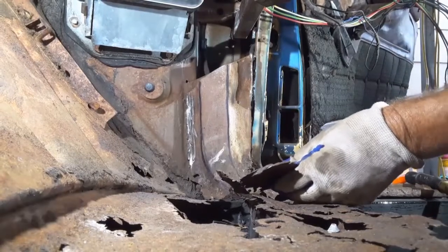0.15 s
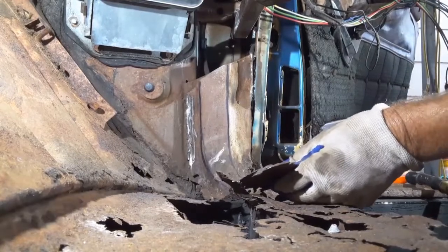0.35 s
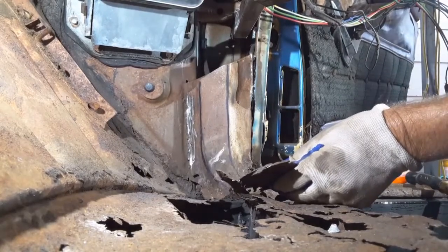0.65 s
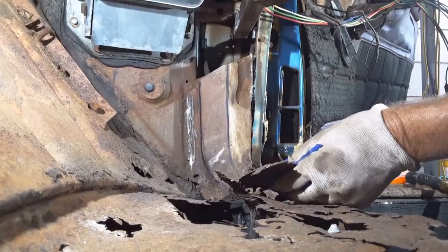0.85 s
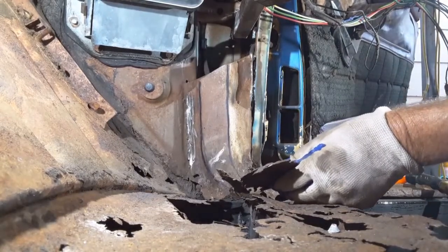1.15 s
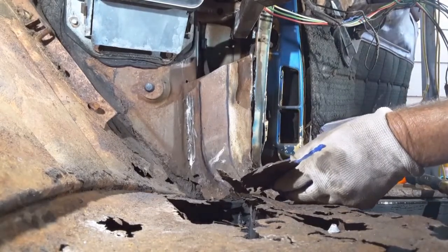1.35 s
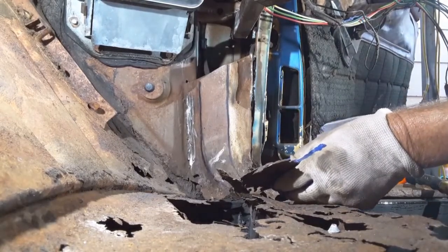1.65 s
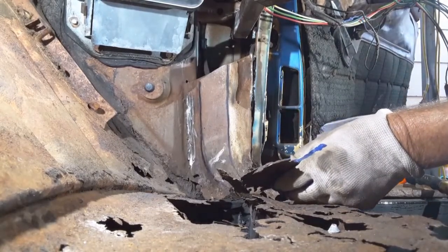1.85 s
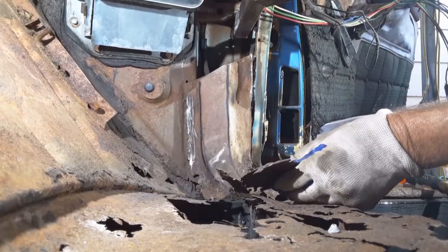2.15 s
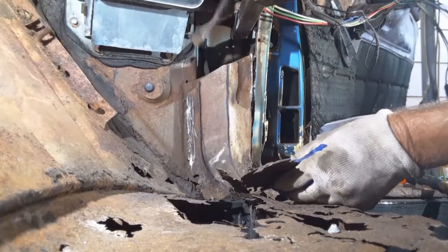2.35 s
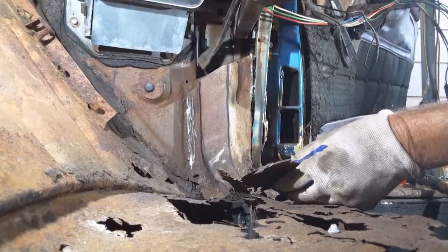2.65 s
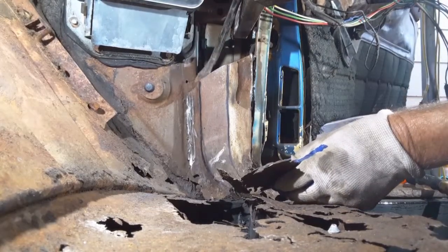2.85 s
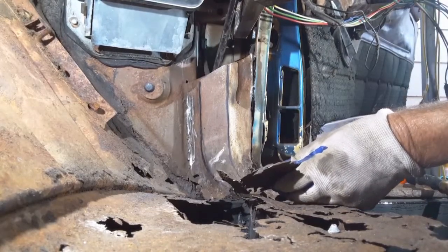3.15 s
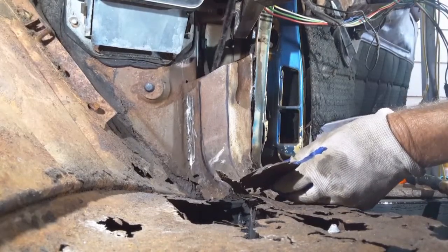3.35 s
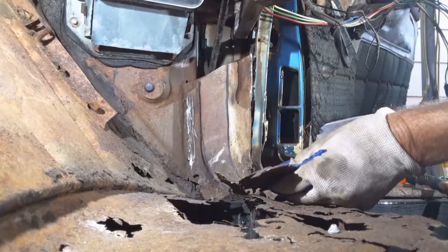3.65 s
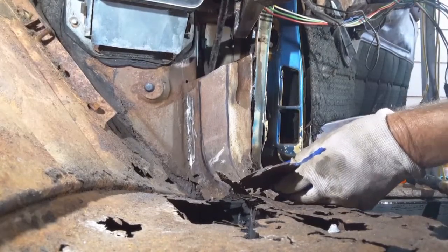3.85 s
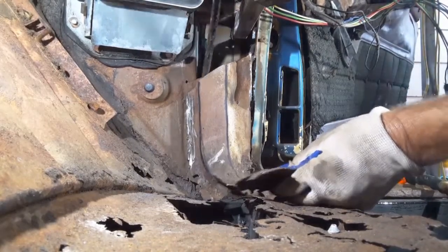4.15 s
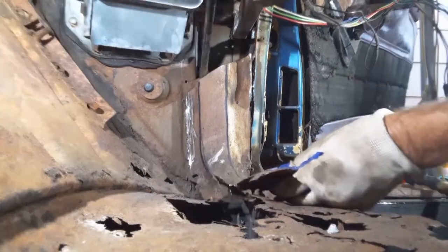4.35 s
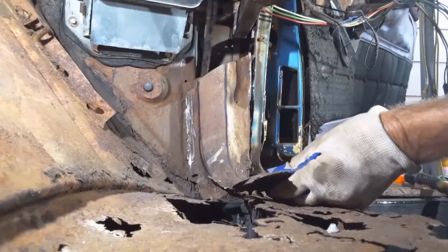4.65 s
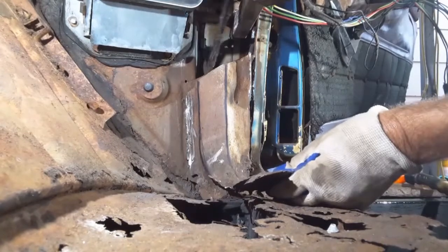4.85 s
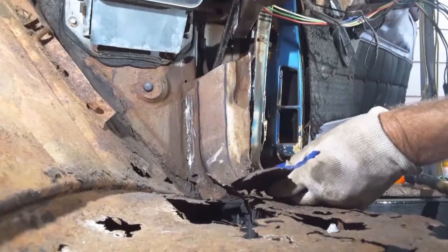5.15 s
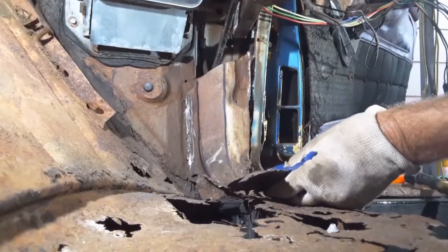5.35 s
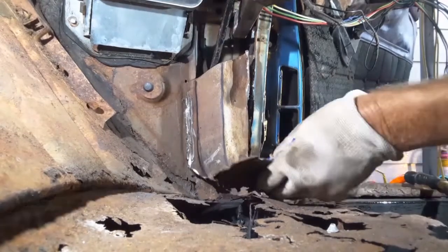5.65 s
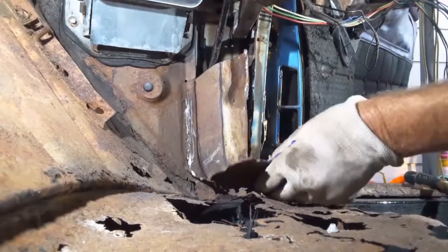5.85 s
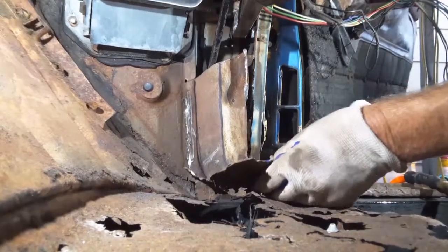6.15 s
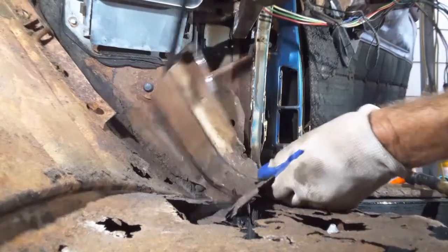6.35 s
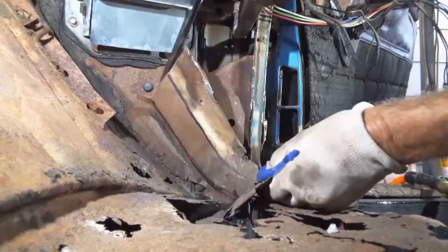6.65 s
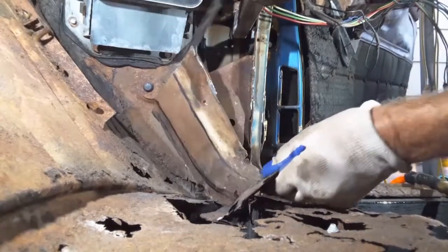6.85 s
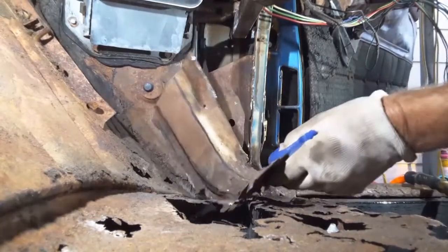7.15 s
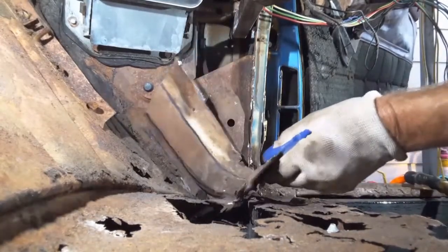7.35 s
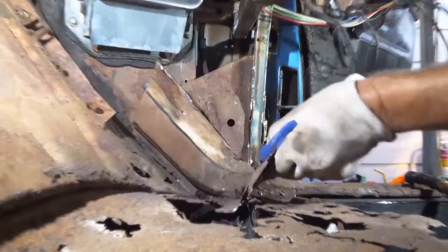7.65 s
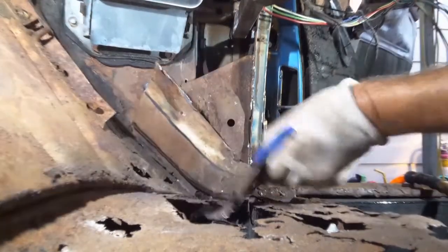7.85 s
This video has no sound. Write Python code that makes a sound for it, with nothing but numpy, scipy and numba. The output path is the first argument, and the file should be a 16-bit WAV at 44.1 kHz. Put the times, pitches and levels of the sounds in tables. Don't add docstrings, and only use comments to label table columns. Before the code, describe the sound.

After a quiet start, crumpled rusty metal clanks, scrapes and rattles close by, ringing briefly, with insect hiss and soft hum behind.

```python
import sys
import numpy as np
from scipy import signal
from scipy.fft import rfft, irfft
from scipy.io import wavfile
from scipy.ndimage import uniform_filter1d, map_coordinates
from numba import njit

SR = 44100
rng = np.random.default_rng(int(sys.argv[2]) if len(sys.argv) > 2 else 0)


def store_wav(level_fs):
    pcm = np.round(np.clip(np.atleast_2d(level_fs), -1, 1) * 32767)
    wavfile.write(sys.argv[1], SR, pcm.T.astype(np.int16))


def boost(x):
    u = np.asarray(x, float) / 20
    return 10 ** u


N = 353241
TIME = np.arange(N) / SR

# start in seconds, peak in dB, boom in dB, hardness in dB. The first six nicks are rust settling.
NICKS = [(.0175, -37.5, -27, -7), (.1694, -46.5, -10, -3), (.4176, -42.5, -9, -3), (.5384, -42, -21, -9),
         (.6903, -42, -26, -2), (.776, -48, -20, -2), (1.466, -27.5, 0, -8), (1.762, -24, -1, -15),
         (5.399, -12.5, -1, 9), (5.412, -12.5, 0, 1), (5.421, -13.5, -9.5, 0.5), (5.529, -24, -20, 0.5),
         (3.488, -13, -30, -13), (6.512, -47.5, -28, 3.5), (6.58, -46.5, -31, 1.5), (2.319, -25, -2, -43),
         (3.619, -27, -26, -16), (3.642, -10, -10, -18.5), (3.966, -45, 14, -41), (4.237, -18, -4.5, -20),
         (4.613, -23, -37, -6.5), (4.854, -30.5, -2, -4.5), (5.503, -18, -19, -12),
         (5.649, -25.5, -6, -5.5), (6.227, -42, -30, 2), (7.328, -22.5, -18, -4), (7.579, -13, -37, -5)]
RUBS = [(1.577, -23.5, 13.5, -16.5), (2.626, -30.5, -5, -3.5), (2.666, -32.5, -6, -2.5),
        (3.355, -11.5, -39, -30), (3.378, -11.5, -28, -19), (3.396, -8.5, -42, -15.5),
        (3.425, -14.5, -4, -12.5), (3.88, -15, -1, -17), (4.381, -22.5, 7.5, -32), (4.71, -21.5, 0, -13),
        (4.797, -19.5, -54, -6), (4.82, -24.5, -41, -5), (5.346, -32.5, -2, -10.5), (5.594, -27, -19.5, 3),
        (5.955, -63, -12, 16.5), (6.46, -38.5, -21, 1.5), (6.101, -28, -35, -1), (6.599, -33, -11, -15),
        (6.752, -27, -4, -1.5), (7.005, -22.5, -4, -4.5), (7.379, -11, -36, -4.5), (7.455, -24, -36, -10),
        (7.857, -21, -66, -6), (7.939, -27.5, -71, -3.5), (7.975, -43, -27, 2.5)]
DRAGS = [(2.182, -15, -44, -11), (2.215, -17, -36, -9), (2.891, -37.5, 9, -40), (3.534, -13, -2, -68),
         (3.599, -13.5, 11.5, -34), (3.791, -32, 18, -5.5), (3.906, -26, 9.5, -9.5),
         (4.11, -19.5, -31, -22), (4.135, -12.5, -57, -18), (4.085, -31, -30, -25),
         (7.435, -11, -22.5, -14.5), (7.825, -30, -50, -2.5), (7.915, -29, -50, -1),
         (6.525, -47.5, -30, 5.5), (6.044, -54.5, -18, 7.5), (6.119, -26, -28, -4.5), (6.151, -44, -27, -4),
         (6.79, -30.5, 8, -5.5), (6.824, -24.5, -7, 4), (7.118, -19.5, -26, -4), (7.151, -28, -20, -8),
         (7.404, -4.5, -49, -7), (7.892, -20, -61, -2.2)]
NICK_S, RUB_S, DRAG_S = 0.0067, 0.017, 0.031


def knocks(*modes):
    kinds = ((NICKS, NICK_S), (RUBS, RUB_S), (DRAGS, DRAG_S))
    soft_contacts = [(*row, length, 1) for kind, length in kinds for row in kind]
    rows = np.array(sorted(hard_contacts() + soft_contacts))
    start = (rows[:, 0] * SR).astype(int)
    peak_db = np.minimum(rows[:, 1], -1.5)
    lengths = np.maximum(rows[:, 4], .001)
    span = 8000
    force = np.zeros(N + span)
    rust = np.r_[grit(4000, 3.0), np.zeros(span)]
    t = TIME[:span]
    swell, bite, bite_s = .45, 1.6, .003
    for i, db, length, soft in zip(start, peak_db, lengths, rows[:, 5]):
        shape = np.exp(-t / length) * (1 - soft * np.exp(-t / (swell * length)))
        shape = shape + (1 - soft) * bite * np.exp(-t / bite_s)
        burst = shape * rust[i:i + span]
        force[i:i + span] += boost(db + 1.5) * burst / np.sqrt(np.sum(burst ** 2))
        force[i] += boost(db - 8.0) * (1 - soft)
    owner = np.clip(np.searchsorted(start, np.arange(N), side="right") - 1, 0, None)
    return ring(force[:N], owner, *contact(rows, *modes, 1.8, 0.0301)) + crack(rows)


# start in seconds, peak in dB, boom in dB, hardness in dB.
TAPS = [(1.831, -16.5, -28, -10), (2.256, -5, -28, -7), (2.283, -8, -21, -10), (2.783, -15, -1, -20.5),
        (3.092, -15.5, 0, -20), (3.457, -9.5, 2, -45), (5.148, -21, -13, -5.5), (6.29, -22, -55, -3.5),
        (6.87, -22.5, -9.5, 3.5), (7.192, -23.5, -14, 0.5), (7.596, -8.5, -46, -13),
        (7.677, -18, -10, -1.5)]
CLANKS = [(1.46, -13, 7.5, -19.5), (3.498, -1, -13, -19), (5.125, -35.5, -32.5, 1.5),
          (1.866, -19.5, -15, -4.5), (1.978, -11, -19, -1.5), (2.024, -3, -29.5, -4.5),
          (3.683, -3.5, 1, -16.5), (4.186, -12, -26, -13.5), (4.672, -12.5, -40, -7.5),
          (4.914, -25.5, -7, 7), (4.942, -19.5, -4.5, -30.5), (5.518, -21.5, -21.5, 4),
          (5.562, -21.5, -23.5, 1.5), (6.387, -34, -40, -1), (7.805, -19.5, -65, -2.5)]
RATTLES = [
    (1.642, -4, -23, -3.5),
    (4.206, -5.5, -14, -10.5),
    (5.402, -7, -10, 1),
    (5.804, -27.5, -28, -9),
    (7.485, -13, -9, -9),
    (7.527, -6.5, -36, -7),
    (7.749, -18.5, -39, -0.5),
]
TAP_S, CLANK_S, RATTLE_S = 0.0075, 0.02, 0.03


def hard_contacts():
    kinds = ((TAPS, TAP_S), (CLANKS, CLANK_S), (RATTLES, RATTLE_S))
    return [(*row, length, 0) for kind, length in kinds for row in kind]


def crack(rows):
    click, t = np.zeros(N), TIME[:SR // 20]
    click[(rows[:, 0] * SR).astype(int)] = boost(rows[:, 1] + rows[:, 3]) * (1 - rows[:, 5])
    snap = boost(17.5) * signal.sosfilt(signal.butter(3, [500, 3500], "band", fs=SR, output="sos"), click)
    spit_s = 0.0032
    dust = signal.fftconvolve(click, np.exp(-t / spit_s))[:N] * rng.standard_normal(N)
    return snap + boost(-26) * signal.sosfilt(signal.butter(4, 7500, "high", fs=SR, output="sos"), dust)


# pitch in Hz, level in dB, time to fall 60 dB in seconds (held to .085
SHELL = [(124, -17, 1.8), (280, -1, 0.18), (362, -7, 0.55), (526, -18, 0.67), (715, -19, 0.097),
         (810, -32, 5.0), (870, -48.5, 0.084), (1071, -56.5, 0.72), (1271, -3.5, 0.066), (1541, -2.5, 0.15),
         (1815, -5, 0.18), (1857, -22, 1.4)]
# pitch in Hz, level in dB, 60 dB fall in seconds.
PIECE = [(1545, -9.5, 0.22), (2470, -22.5, .08), (3160, -1, .12), (3246, -2, 0.18), (3800, -18.5, 0.072),
         (4540, -19, .1), (5030, -10, 0.42), (6130, -11.5, 0.16), (6850, -8.5, 0.17), (7500, -9, 0.14),
         (9200, -20, .08)]
EDGE_HZ = [60, 300, 1500, 4000, 8000, 15000]
BAND_MODES = [26, 90, 110, 85, 65]


def shell_modes(t60_low, slope, loose_db):
    bands = zip(EDGE_HZ, EDGE_HZ[1:], BAND_MODES)
    hz = np.concatenate([rng.uniform(low, high, count) for low, high, count in bands])
    spread = np.exp(.3 * np.clip(rng.standard_normal(len(hz)), -2, 1))
    t60 = t60_low * (hz / 300) ** -slope * spread
    share_db = loose_db - 10 * np.log10(np.repeat(BAND_MODES, BAND_MODES))
    named_hz, named_db, named_t60 = np.transpose(SHELL)
    piece_hz, piece_db, piece_t60 = np.transpose(PIECE)
    named_t60 = np.minimum(named_t60, .085)
    return (np.r_[hz, named_hz, piece_hz], np.r_[share_db, named_db - 8, piece_db - 15],
            np.r_[t60, named_t60, piece_t60])


# from when in seconds, then edge ring, grit, dry flakes and free piece in dB.
STAGES = [
    (0, 0.5, 2.5, -5, -5.5),
    (1.75, 2, 1.5, -11.5, -7),
    (2.75, 5.5, 7, -7.5, -3.5),
    (4.5, 1.5, 6, -6, -6.5),
    (5.38, -1.5, 4, -5.5, -2.5),
    (5.7, 2.5, 2.5, -2, 4),
    (6.7, 1, 4.5, -4, -2),
]
# from when in seconds, floor pan in dB, panels in dB.
GRIP = [(0, -6, 0), (1.55, 3, -0.5), (1.8, 1, -0.5), (1.95, 1, -1.5), (2.15, 1, -2.5), (2.5, 3, -3),
        (3, 3, 0), (3.3, 0.5, 1), (3.48, -1, -1.5), (3.67, 2, 0), (3.85, 0.5, -3), (4.05, -3, 1.5),
        (4.55, -5, 2.5), (4.9, -2.5, 1), (5.1, -1, 0.5), (5.38, 0.5, -0.5), (5.5, -1.5, -1),
        (5.75, -3.5, -0.5), (6.08, 0.5, -1), (6.27, -2, 1.5), (6.36, 0.5, -1), (6.72, 1.5, 2),
        (6.98, 2, -1.5), (7.3, -1, 0), (7.56, 0, -0.5), (7.72, -2.5, 3.5)]
BAND_HZ = [85, 150, 420, 900, 2200, 5500, 7500, 9000, 12000]


def contact(rows, hz, share_db, t60, scatter_db, bend):
    stages, grips = np.array(STAGES), np.array(GRIP)
    stage = stages[np.searchsorted(stages[1:, 0], rows[:, 0])]
    grip = grips[np.searchsorted(grips[1:, 0], rows[:, 0])]
    edge_db = rows[:, 3] + stage[:, 1]
    grit_db = 1.63 * rows[:, 3] + stage[:, 2]
    flakes_db = stage[:, 3]
    tilt = []
    for low, (_, pan, panel), edge, top, fine in zip(rows[:, 2], grip, edge_db, grit_db, flakes_db):
        balance = [low - 10, low - 3.5, pan - 1.1, panel - 3.5, edge,
                   top - 2.5, top - 5, top + fine - 5, top + fine - 2.5]
        tilt.append(np.interp(np.log(hz), np.log(BAND_HZ), balance))
    chance = rng.standard_normal((len(rows), 3, len(hz)))
    free = np.arange(len(hz)) >= len(hz) - len(PIECE)
    scatter = scatter_db * np.where(free, -4 * np.abs(chance[:, 1]), chance[:, 1])
    gain = np.sign(chance[:, 0]) * boost(np.array(tilt) + share_db + free * stage[:, 4:] + scatter)
    bent_hz = hz * (1 + bend * np.where(free, .1, 1) * chance[:, 2])
    return gain, poles(np.minimum(bent_hz, .45 * SR), t60)


def poles(hz, t60):
    return np.exp(2j * np.pi * hz / SR - np.log(1000) / (np.maximum(t60, .005) * SR))


@njit
def ring(force, owner, gain, pole):
    out = np.zeros(len(force))
    for m in range(pole.shape[1]):
        z = 0j
        for i in range(len(force)):
            z = z * pole[owner[i], m] + gain[owner[i], m] * force[i] + 1e-18
            out[i] += z.imag
    return out


def level(x, db):
    return x * boost(db) / np.sqrt(np.mean(x ** 2))


def grit(rate, spread_db):
    hit = rng.random(N) < rate / SR
    return level(hit * rng.choice([-1., 1.], N) * boost(spread_db * rng.exponential(size=N)), 0)


def walk(rate):
    k = int(SR / rate)
    steps = np.repeat(rng.standard_normal(N // k + 1), k)
    return uniform_filter1d(uniform_filter1d(steps, k), k)[:N]


# time in seconds, effort in dB, hardness in dB.
SCRAPE = [(1.45, -66, -3), (1.65, -24, -44), (1.9, -30, -37), (2.22, -16.5, -18), (2.45, -30.5, -14),
          (3.05, -32.5, -19.5), (3.45, -22, -3.5), (3.851, -26.5, -37.5), (4.15, -27.5, -3),
          (4.45, -31, -16.5), (4.8, -29, -10.5), (5.55, -32, -29.5), (5.86, -35, -15), (6.6, -38.5, -2.5),
          (6.799, -39, -35), (7.33, -28, -0.5), (7.452, -12.5, -20), (8.0, -31.5, 3.5)]


def scrape(*modes):
    s, effort_db, hard_db = np.transpose(SCRAPE)
    hop, boom_db, slip_db = 1764, -8, 2.2
    at = TIME[::hop]
    rows = np.transpose([at, at, 0 * at + boom_db, np.interp(at, s, hard_db)])
    drag = boost(np.interp(TIME, s, effort_db, left=-120) - 34 + slip_db * walk(40))
    return ring(drag * grit(4000, slip_db), np.arange(N) // hop, *contact(rows, *modes, 1.8, 0.028))


def waver(x):
    return map_coordinates(x, [np.arange(N) + 3e-5 * SR * walk(90)], mode="mirror")


# start in seconds, peak in dB, pitch in Hz.
PARTIALS = [(1.46, -11, 504), (1.639, -20, 1600), (1.979, -4.5, 1650), (2.025, -5.5, 1707),
            (2.256, -22, 650), (2.284, -8, 736), (2.781, -12.5, 370), (3.093, -9, 312), (3.499, -1.5, 306),
            (3.683, 2.5, 304), (4.185, -3.5, 1484), (4.612, -22, 770), (4.928, -5.5, 903), (5.403, -3, 390),
            (5.404, -3.5, 1047), (6.766, -21, 693), (7.484, -5, 1320), (7.595, -8.5, 734)]
# start in seconds, pitch in Hz, level in dB, 60 dB fall in seconds.
BOOMS = [(1.461, 129, -23.5, 0.29), (1.469, 94, -34, .4), (2.048, 127, -28, 0.55), (3.451, 50, -36, 0.89),
         (3.454, 151, 3, 0.037), (2.784, 94, -35.5, 0.28), (4.21, 97.8, -31, 0.63),
         (7.011, 90.5, -39, 0.44), (7.401, 85.4, -36, 0.57), (7.75, 90, -41, 0.35), (3.459, 98, -17, 0.77),
         (3.5, 86, -20.5, 0.44), (3.682, 245.5, -1.5, 0.081), (4.21, 280, -33, 0.62),
         (4.705, 204, -19, 0.064), (5.156, 224, -22, 0.11), (5.405, 50, -25, 0.097),
         (5.412, 292, -10.5, 0.24), (7.49, 55, -49, .36)]
# start in seconds, pitch in Hz, level in dB, 60 dB fall in seconds.
SINGING = [(1.75, 361, -22.5, 0.69), (2.1, 1320, -43.5, 0.85), (2, 750, -45, 0.94),
           (4.23, 620, -30.5, 0.88), (4.68, 780, -21, 0.2), (4.815, 790, -23, 0.2), (4.92, 750, -34, 0.21),
           (5.41, 230, -48, 0.62), (5.571, 1800, -47.5, 1.6), (5.806, 1400, -54, 1),
           (5.805, 3360, -44, 0.25), (3.608, 1550, -27.5, 0.21), (5.56, 2400, -16.5, 0.066),
           (7.49, 7500, -26, 0.19), (7.855, 6600, -29.5, 0.25), (7.855, 3250, -24, 0.18),
           (7.78, 800, -21, 0.17), (7.3, 4100, -37, 0.22), (4.8, 2600, -42, 0.11),
           (6.131, 1071, -39.5, 2.1), (6.15, 1836, -39.5, 2.2), (7.4, 1836, -22.5, 0.41),
           (7.534, 3700, -29.5, 0.6), (7.598, 1071, -31.5, 1.9), (7.6, 1100, -19.5, 0.44),
           (7.605, 3100, -23.5, 0.19)]


def partials():
    clang_t60_s = .09
    rows = [(s, hz, db - 6.0, clang_t60_s) for s, db, hz in PARTIALS] + BOOMS + SINGING
    knocked = np.r_[np.sort(np.array(hard_contacts())[:, 0]), N]
    out = np.zeros(N)
    for s, hz, db, t60 in rows:
        start = int(s * SR)
        t = TIME[:N - start]
        fade = boost(-60 * t / max(t60, .02) + 4.5 * walk(45)[:len(t)])
        swell = (1 - np.exp(-t / .0015)) * fade
        next_knock = knocked[knocked > s + .02][0]
        choked = (hz > 1000) & (t + s > next_knock)
        loudness = boost(db - 10 * uniform_filter1d(1. * choked, 200))
        out[start:] += loudness * swell * np.sin(2 * np.pi * hz * t)
    return out


def workshop(x, t60, top_hz):
    t = TIME[:SR // 2]
    tail = rng.standard_normal(len(t)) * boost(-60 * t / t60) * (t > .002)
    tail = signal.sosfilt(signal.butter(1, top_hz, fs=SR, output="sos"), tail)
    return signal.fftconvolve(x, tail / np.sqrt(np.sum(tail ** 2)))[:N]


# frequency in Hz, level in dB.
CHORUS = [(1700, -26), (2450, -17), (2900, -6), (3500, -3.5), (4300, -2), (5200, 0), (6000, -2), (6800, -6),
          (7600, -14), (8600, -26)]
# frequency in Hz, level in dB per Hz.
HUM = [(15, -68.5), (25, -13.5), (59, -11), (137, -1), (205, -15.5), (240, -4), (312, -14), (397, -12.5),
       (604, -23.5), (738, -18.5), (884, -25.5), (2460, -31), (3000, -52), (3900, 8.5), (6600, -120)]


def background():
    duck = np.clip((TIME - 5.38) / .12, 0, 1)
    creep_db = 2.5 * np.clip(TIME - 6.7, 0, None)
    early = np.clip((.5 - TIME) * 10 + .5, 0, 1)
    duck_db = -9.5 * duck
    chorus = level(coloured(CHORUS, 0.18, 2.1), -50.3) * boost(3 * early + duck_db + creep_db)
    hum = signal.sosfilt(signal.butter(8, 2800, fs=SR, output="sos"), coloured(HUM, 2.5, 6))
    hum = level(hum, -51) * boost(early + duck_db + creep_db / 2)
    return chorus + hum + air() * boost(2 * (TIME < .2) + duck_db / 2)


# frequency in Hz, level in dB.
AIR = [(8300, -14), (9500, -5), (11500, 0), (13500, -2), (14800, -4)]


def air():
    return level(coloured(AIR, 4.0, 7), -64.5)


def coloured(points, swell_db, rate):
    hz, db = np.transpose(points)
    f = np.fft.rfftfreq(N, 1 / SR) + 1
    white = rfft(rng.standard_normal(N)) * boost(np.interp(np.log(f), np.log(hz), db))
    out = 0
    for centre in np.arange(np.log2(hz[0]), np.log2(hz[-1]) + .5, .5):
        share = np.clip(1 - np.abs(np.log2(f) - centre) / .5, 0, 1)
        out = out + boost(swell_db * walk(rate)) * irfft(white * share, N)
    return out


# time in seconds, side level under the middle in dB.
PARTING = [(2.04, -21), (2.57, -19), (2.78, -18), (3.69, -28), (4.221, -15.5), (5.418, -12), (5.542, -19),
           (5.8, -21), (5.859, -17), (5.97, -11), (6.05, -8), (6.77, -20), (6.869, -6.5), (7.391, -9.5),
           (7.581, -11), (7.681, -18.5)]


def scene():
    modes = shell_modes(0.089, 0.43, -1.2)
    steel = waver(knocks(*modes) + scrape(*modes))
    steel = signal.sosfilt(signal.butter(4, 80, "high", fs=SR, output="sos"), steel)
    cabin = waver(workshop(steel, 0.21, 15000))
    room = waver(workshop(steel, 0.26, 3000))
    mid = steel + boost(-12.0) * cabin + boost(-12.0) * room + background() + partials()
    apart = sum(boost(db) * np.clip(1 - np.abs(TIME - s) / 0.028, 0, 1) for s, db in PARTING)
    edge = signal.sosfilt(signal.butter(1, 1500, "high", fs=SR, output="sos"), mid)
    side = apart * np.roll(edge, 40)
    return np.array([mid + side, mid - side])


def thin_top(x, from_hz, mask_db):
    f, _, spectrum = signal.stft(x, SR, nperseg=1024)
    size = np.abs(spectrum).mean(axis=0)
    mask = boost(mask_db) * size[(f > 2500) & (f < 7000)].mean(axis=0)
    kept = spectrum * ((f[:, None] < from_hz) | (size > mask))
    thin = signal.istft(kept, SR, nperseg=1024)[1][:, :N]
    band = signal.butter(2, [1500, 7000], "band", fs=SR, output="sos")
    presence = signal.sosfilt(band, x.mean(axis=0))
    span = int(.012 * SR)
    power = uniform_filter1d(presence ** 2, span)
    jump = np.roll(power, -span // 2) > boost(2 * 11) * np.roll(power, span // 2)
    gate = uniform_filter1d(1. * np.roll(jump, span // 2), span // 4)
    return thin + gate * (x - thin)


def roll_off(x):
    return signal.sosfilt(signal.butter(12, 14850, fs=SR, output="sos"), x)


def record(dry):
    trimmed = signal.sosfilt(signal.butter(1, 40, "high", fs=SR, output="sos"), dry)
    trimmed = signal.sosfilt(signal.ellip(8, .2, 70, 14800, fs=SR, output="sos"), trimmed)
    mix = np.clip(thin_top(trimmed, 7400, -12), -1, 1)
    return roll_off(mix)


dry = scene()
out = record(dry)
store_wav(out)
```